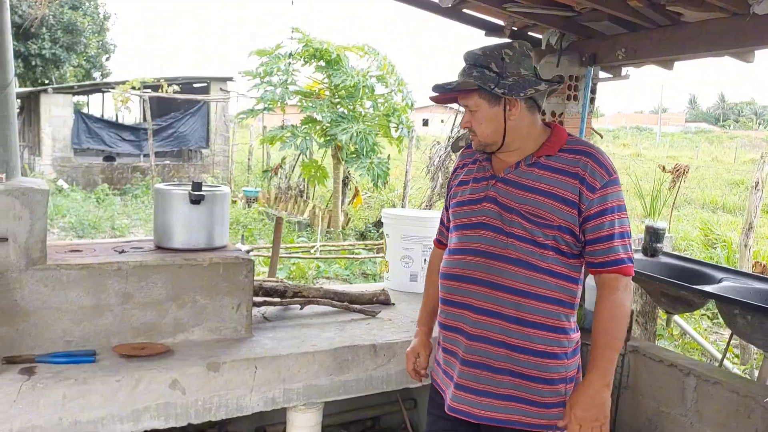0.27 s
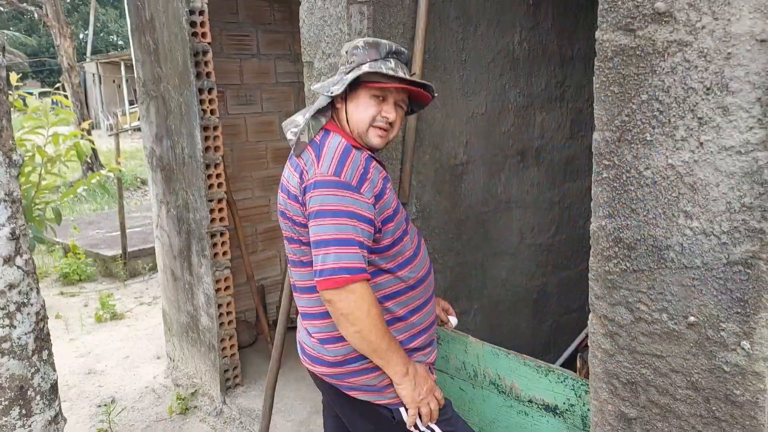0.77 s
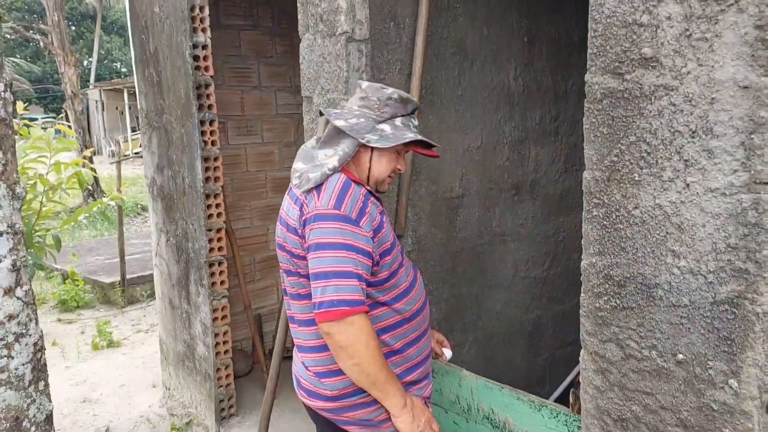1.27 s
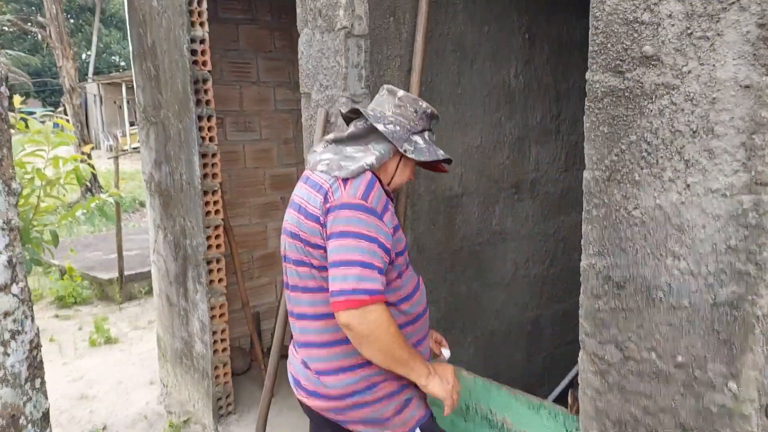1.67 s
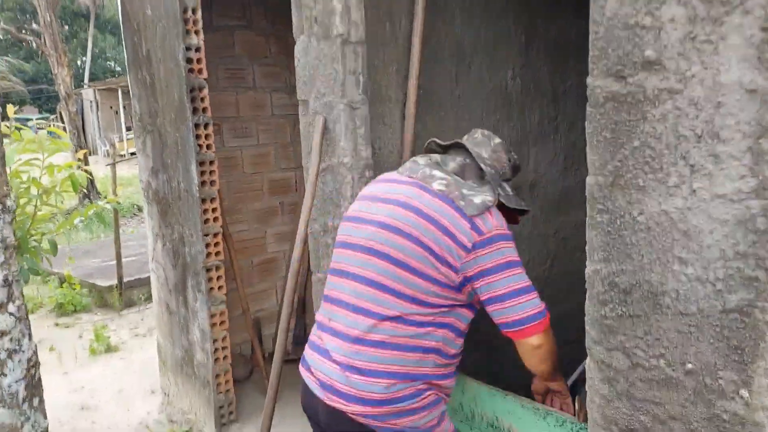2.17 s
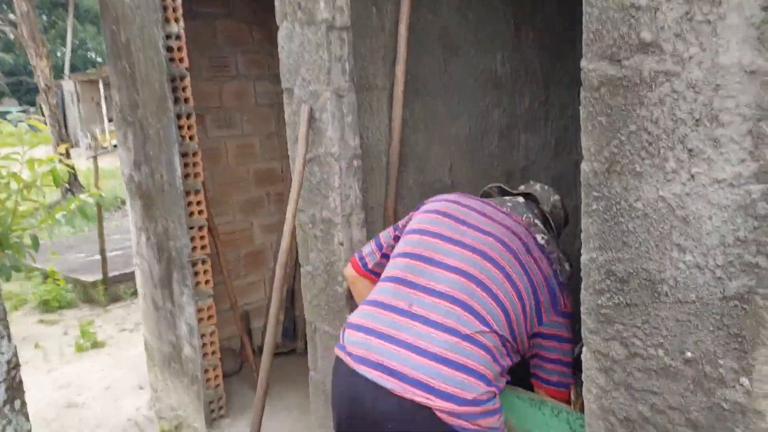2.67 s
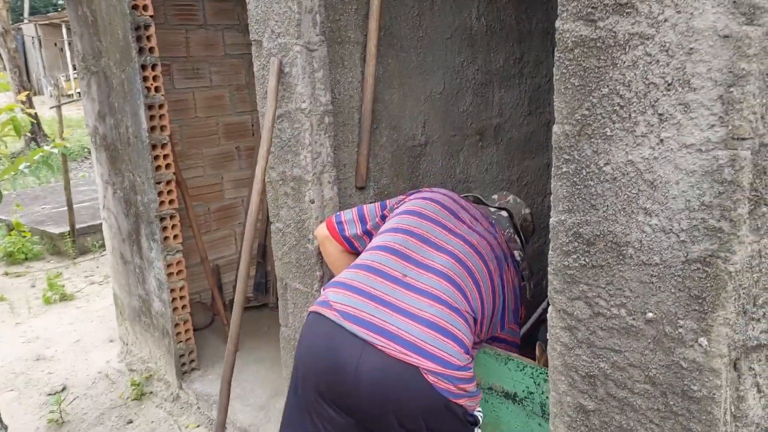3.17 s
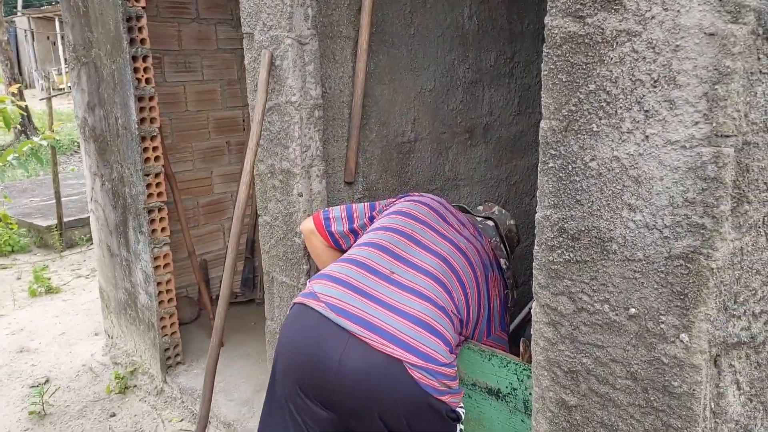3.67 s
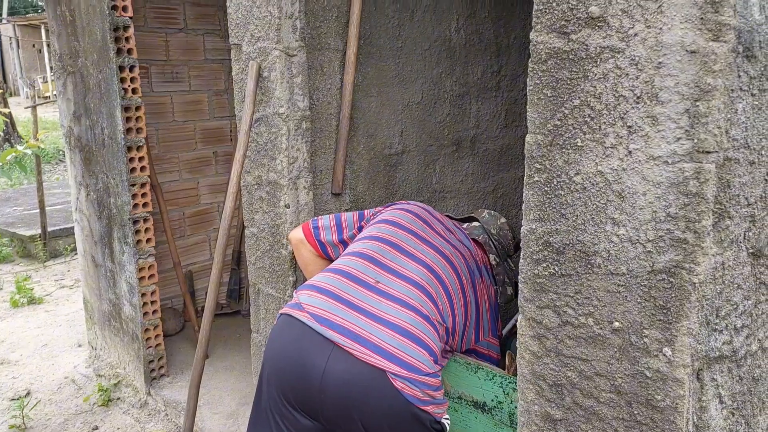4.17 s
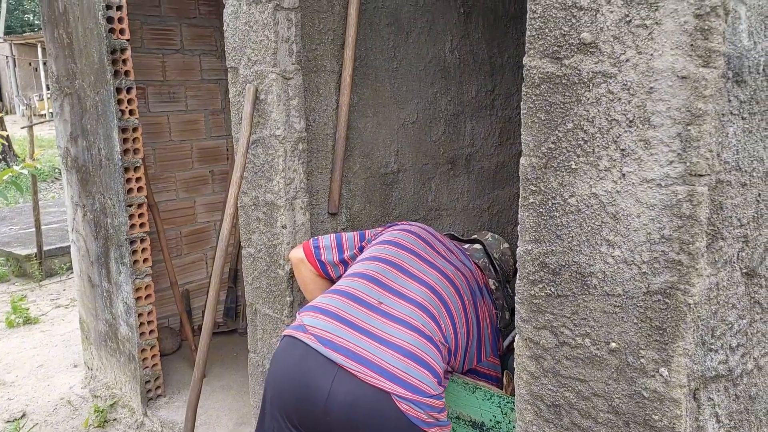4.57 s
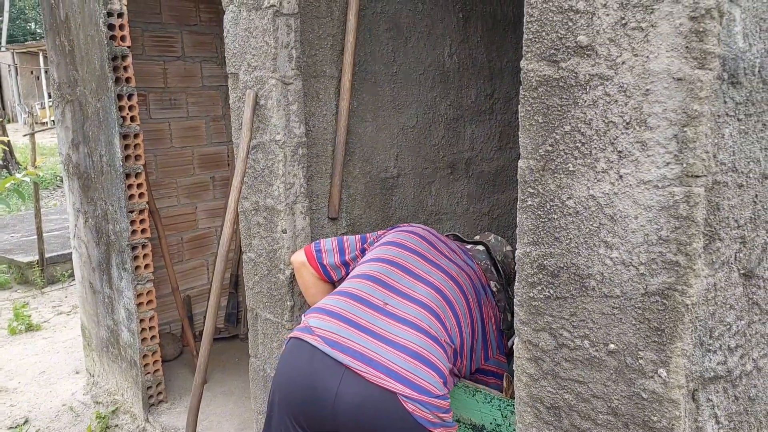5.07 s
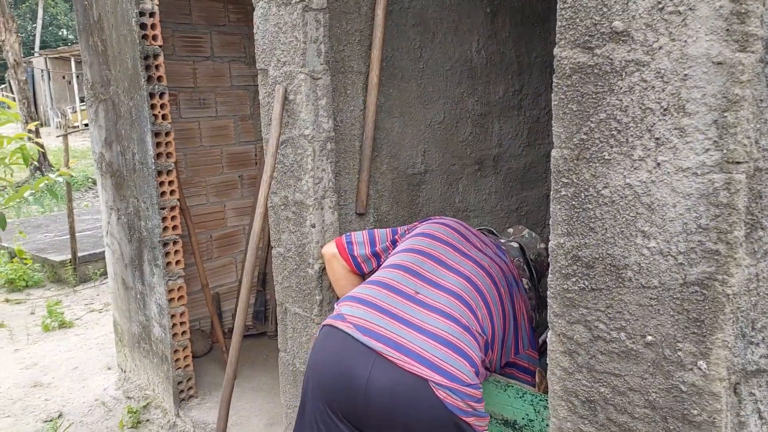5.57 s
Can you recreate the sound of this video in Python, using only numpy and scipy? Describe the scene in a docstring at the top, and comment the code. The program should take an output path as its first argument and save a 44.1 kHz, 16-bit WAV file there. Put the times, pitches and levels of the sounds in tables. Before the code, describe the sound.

A loud, wavering low drone in rushing noise ends abruptly with a hard clack. In a quiet yard with wind buffeting the microphone, faint chick peeps, scuffs and soft bumps lead to a burst of hoarse hen clucks inside a close concrete coop. A sharp board knock and a bright metal clank follow, then sparse weak clucks and a final shrill scrape.

```python
"""Hens caught in a concrete coop

A loud low rumble, a wavering drone in rushing noise, stops dead. Then hens are caught by hand in a small coop:
short hoarse clucks, pulses and rasp filtered by throat and beak, ring between the walls. Friction noise makes the
rustling feathers, struck resonances the knocks on a board, decaying modes one metal clank, and noise bursts the
snaps of twigs. Chicks peep faintly as gliding whistles; a light wind, slow low noise, buffets the microphone."""
import sys
import numpy as np
from scipy import signal
from scipy.fft import rfft, irfft, next_fast_len
from scipy.io import wavfile
from scipy.ndimage import uniform_filter1d, map_coordinates

SR = 44100
rng = np.random.default_rng(int(sys.argv[2]) if len(sys.argv) > 2 else 0)


def inscribe(sig):
    """Save sig as 16-bit PCM at rate SR to the path in sys.argv[1].

    A 1-D sig is mono; a 2-D sig holds one channel per row.
    Samples are clipped to [-1, 1] before scaling.
    """
    pcm = np.round(np.clip(np.atleast_2d(sig).T, -1, 1) * 32767)
    wavfile.write(sys.argv[1], SR, pcm.astype(np.int16))


N = 256986
T = np.arange(N) / SR
LOCAL = T[:SR // 2]  # time axis of one short event, in seconds

# Hen calls. Each row: start in seconds, length in seconds, pitch in Hz, level in dB, beak resonance in Hz,
# roughness from 0 to 1.
CALLS = [(1.2, 0.15, 743, -39.5, 740, 0.06), (2.91, 0.026, 662, -15, 1210, 0.4),
         (2.948, 0.027, 790, -11, 764, 0.15), (3.054, 0.034, 474.5, -4.5, 1010, 0.36),
         (3.08, 0.031, 588, -10.5, 1470, 0.22), (3.211, 0.034, 592.8, -8.5, 850, 0.33),
         (3.321, 0.046, 537, -19.5, 1250, 0.57), (3.381, 0.037, 544, -13.5, 1020, 0.37),
         (3.719, 0.034, 437.3, -26.5, 950, 0.48), (3.757, 0.037, 567, -24.5, 1110, 0.48),
         (3.936, 0.042, 522.5, -21.5, 1050, 0.59), (3.959, 0.047, 493, -20.5, 1010, 0.6),
         (4.501, 0.032, 398, -25.5, 1000, 0.41), (4.726, 0.043, 457, -32.5, 1180, 0.79),
         (5.276, 0.025, 418.5, -27.5, 1110, 0.78)]
# Response of the throat. Each row: frequency in Hz, gain in dB.
THROAT_RESPONSE = [(100, -38), (300, -14.5), (550, 2.5), (1400, -1), (1800, -10.5), (2100, -3),
                   (2400, -4.5), (3000, -16), (4100, -54), (5500, -56), (12000, -60)]
PITCH_SAG = 0.021  # share by which the pitch falls during a call
CREST_SHARE = 0.46  # share of a call spent swelling
# thin hiss from the open beak, its level relative to the call
HISS_DB, HISS_HZ, HISS_WIDTH_HZ = -21.5, 3590, 2470

# Decay of the coop. Each row: frequency in Hz, reverberation time T60 in seconds.
COOP_T60 = [(150, 0.33), (700, 0.27), (2000, 0.29), (6000, 0.2), (14000, 0.096)]
# Standing waves of the coop. Each row: frequency in Hz, width in Hz, boost in dB.
STANDING_WAVES = [(605, 16, 12), (776, 59, 5.5), (900, 37, 3), (1260, 29, 8), (1420, 28, -11),
                  (1680, 27, 8)]
# Likeness of the two channels of a noise. Each row: frequency in Hz, correlation from 0 to 1.
LIKENESS = [(50, 0.22), (130, 0.42), (300, 0.69), (600, 0.69), (1000, 0.12), (2000, 0.32), (4000, 0),
            (12000, 0.064)]

RUMBLE_END_S = 0.826
# Level of the drone. Each row: time in seconds, relative level in dB.
DRONE_LEVEL = [(0.0, -32), (0.088, -9), (0.254, -11), (0.274, -31), (0.328, -9.5), (0.426, -19),
               (0.516, -15.5), (0.536, -10), (0.622, -6), (0.672, -11.5), (0.8, -7.5)]
DRONE_START_HZ, DRONE_CLIMB_HZ_PER_S = 74.3, 4.2
DRONE_WAVER, DRONE_DB = 0.033, -0.6  # unsteadiness of pitch as a share; overall level of the drone
BOOM_DB, RUSH_DB = -20.5, -23.5  # steady low noise; mean level of the rushing noise
# Spectrum of the rushing noise. Each row: frequency in Hz, relative density in dB per Hz.
RUSH_SPECTRUM = [(76, -1.5), (130, -5.5), (274, -10), (472, -15), (625, -11), (829, -21), (954, -18.5),
                 (1430, -18.5), (2180, -18), (2610, -23), (4780, -22), (7300, -27.5), (8230, -34),
                 (14200, -29), (16000, -32)]
# Hollow resonances in the rushing noise. Each row: frequency in Hz, width in Hz, boost in dB.
HOLLOW_RESONANCES = [(572, 45, 5.5), (653, 31, 2.5), (955, 62, 7), (2200, 130, 2.5), (4670, 1040, 4.5)]

# Blows on the board. Each row: start in seconds, relative level in dB, decay of the contact noise in seconds,
# frequency in Hz above which the blow is dull.
BLOWS = [(2.272, -29, 0.048, 905), (2.313, -29, 0.027, 400), (2.442, -20, 0.03, 350),
         (2.456, -13.5, 0.0094, 2000), (2.861, -13.5, 0.045, 1800), (3.497, 5, 0.0074, 1010)]
# Resonances of the board. Each row: frequency in Hz, width in Hz, gain in dB.
BOARD_MODES = [(290, 30, -1.5), (364, 79, 3.5), (500, 120, -3), (698, 160, 0.5), (927, 90, 5.5),
               (1180, 120, -9)]
# Low bumps. Each row: start in seconds, relative level in dB, frequency in Hz.
BUMPS = [(1.101, -11, 88), (2.096, -11, 126), (2.348, -12.5, 73), (2.44, -16, 289), (4.904, -8.5, 80),
         (5.647, -11, 73.5)]

CLANK_S = 4.144
# Modes of the metal. Each row: frequency in Hz, relative level in dB, free decay T60 in seconds.
METAL_MODES = [(1588, -10, 0.36), (2783, -3, 0.18), (3332, -4, 0.23), (3505, -4, 0.29), (3822, -9, 0.13),
               (4425, -8, 0.14), (5922, 0, 0.15), (6212, -7, 0.16), (6503, -16, 0.47), (7084, -11, 0.46),
               (7305, -1, 0.15), (7714, -17, 0.2), (8990, -11, 0.13), (9615, -7, 0.1), (11350, -9, 0.11),
               (11700, -17, 0.13), (12050, -17, 0.13), (14550, -22, 0.15), (14810, -20, 0.15),
               (15290, -14, 0.17)]
# Spectrum of the clash. Each row: frequency in Hz, relative level in dB.
CLASH_SPECTRUM = [(300, -15), (1000, -23), (1500, -8.5), (2200, -8.5), (3400, -4.5), (4200, -14), (5500, 0),
                  (7300, -5.5), (8300, -16), (11300, -4.5), (13000, -20), (15500, -17)]

# Snaps of twigs and grit. Each row: start in seconds, relative level in dB, centre in Hz, decay T60 in seconds.
SNAPS = [(0.878, -21, 2500, 0.006), (1.671, -17.5, 3030, 0.0073), (1.799, -27.5, 1500, 0.036),
         (1.943, -20.5, 2480, 0.11), (2.093, -21.5, 2330, 0.0067), (2.186, -12.5, 5200, 0.01),
         (2.197, -21.5, 1710, 0.024), (2.427, -6, 1470, 0.006), (5.798, -2.5, 1800, 0.0055)]
SNAP_WIDTH = 0.89  # width of each snap resonance over its centre
CLACK_S, CLACK_DB, CLACK_T60_S = 0.796, -9.5, 0.037  # a hard clack just before the rumble stops
# Resonances of the clack. Each row: frequency in Hz, width in Hz, gain in dB.
CLACK_RESONANCES = [(1750, 610, -3), (4483, 330, 3.5), (7860, 10000, -18.5)]

# Brief hissing strokes, some brightening the rush of the rumble. Each row: crest in seconds,
# rise plus fall in seconds, level in dB, centre in Hz.
HISSING_STROKES = [(0.01, 0.042, -33, 5000), (0.236, 0.052, -19.5, 3270), (0.73, 0.24, -37, 14000),
                   (0.81, 0.02, -19, 7000), (1.14, 0.2, -40, 7850), (1.46, 0.079, -37.5, 7000),
                   (1.803, 0.08, -34, 3930), (1.955, 0.05, -26, 4400), (2.14, 0.15, -34.5, 2900),
                   (2.44, 0.14, -31, 2290), (2.87, 0.062, -25.5, 2700), (2.985, 0.2, -28, 2540),
                   (3.045, 0.027, -19.5, 4400), (3.18, 0.057, -30, 3070), (3.27, 0.06, -29, 4550),
                   (3.44, 0.087, -35, 4030), (3.6, 0.027, -28.5, 7100), (3.922, 0.046, -29.5, 6300),
                   (5.49, 0.078, -35, 2030), (5.7, 0.12, -35, 710)]
# Narrow-band scuffs, low or middling in pitch. Each row: crest in seconds, rise plus fall in seconds,
# level in dB, centre in Hz.
NARROW_SCUFFS = [(0.059, 0.032, -29, 2010), (1.07, 0.25, -35, 337), (2.495, 0.06, -28, 810),
                 (3.38, 0.24, -33, 210), (4.195, 0.06, -31, 486), (4.65, 0.12, -42, 2020),
                 (5.18, 0.17, -34, 2000), (5.21, 0.26, -37, 760)]
HISSING_WIDTH, SCUFF_WIDTH = 2.9, 0.58  # width of the resonance over its centre
RISE_SHARE = 0.43  # share of a stroke spent rising
# Colour of the friction noise. Each row: frequency in Hz, gain in dB.
FRICTION_COLOUR = [(100, 5), (500, 4.5), (2500, 1), (7200, -0.5), (8400, -9), (11000, -1.5), (16000, -0.5)]
# Fine rustle of the struggle. Each row: time in seconds, level in dB.
BUSTLE_LEVEL = [(1.9, -45), (2.4, -44.5), (2.8, -46), (3.1, -37), (3.4, -41.5), (3.7, -43.5), (4.1, -45.5),
                (4.4, -56)]
BUSTLE_HZ, BUSTLE_WIDTH_HZ, BUSTLE_GRAIN_DB = 6500, 29000, 3  # its colour and its graininess
# a shrill scrape that builds up and breaks off
SCRAPE_S, SCRAPE_RISE_S, SCRAPE_FALL_S, SCRAPE_DB = 5.798, 0.05, 0.015, -19.5
# Resonances of the scrape. Each row: frequency in Hz, width in Hz, gain in dB.
SCRAPE_RESONANCES = [(1660, 620, -1.5), (3570, 790, 0.5), (6850, 5200, -14)]

# Chick peeps. Each row: start in seconds, length in seconds, top pitch in Hz, relative level in dB,
# scoop at the start from 0 to 1, drop at the end from 0 to 1.
CHICK_PEEPS = [(1.108, .18, 3970, -34.5, .22, .3), (2.04, .135, 4100, -43, .16, .15),
               (2.685, .175, 4060, -38.5, .01, .14)]

# Strength of the breeze between gusts. Each row: time in seconds, relative level in dB.
BREEZE_LEVEL = [(0.87, -50.5), (1.4, -37), (1.5, -38), (2.26, -36), (2.63, -38.5), (4.15, -29.5),
                (5.48, -32), (5.8, -35.5)]
# Brief gusts. Each row: crest in seconds, level in dB.
GUST_CRESTS = [(1.45, -20), (1.53, -23), (1.79, -30.5), (1.98, -26), (2.11, -14.5), (4.97, -22.5),
               (5.11, -23.5), (5.66, -21.5)]
# Spectrum of the buffeting. Each row: frequency in Hz, relative density in dB per Hz.
BUFFET_SPECTRUM = [(13, -57), (22, -20), (48, -1.5), (81, 7), (96, 7), (114, -3.5), (160, -9.5),
                   (200, -16.5), (260, -23.5), (340, -17.5), (570, -120)]
BREEZE_DB, GUST_S = 5, 0.048  # overall level of the breeze; half length of a gust
WIND_LEFT_DB = 3.16  # gain on the left and loss on the right
# Hiss of the yard. Each row: time in seconds, level in dB.
YARD_LEVEL = [(0.85, -37.5), (2.4, -36), (5.8, -36)]
YARD_FLICKER_DB = 1.36  # unsteadiness of the hiss
# Spectrum of the hiss. Each row: frequency in Hz, relative density in dB per Hz.
YARD_SPECTRUM = [(88, -7), (150, -11), (309, -16), (414, -13.5), (448, -17), (514, -19.5), (730, -17),
                 (979, -20.5), (1120, -21), (1210, -22), (1290, -22), (2100, -20), (5360, -23),
                 (16000, -40.5)]

# the recorder: limiter ceiling over full scale, its recovery, upper band limit
CEILING_DB, RELEASE_DB_PER_S, TOP_HZ = 1.5, 42, 15900


def amp(db):
    """Level law: decibels to amplitude gain."""
    return 10 ** (np.asarray(db) / 20)


def unit(x):
    """Normalisation of power: scale to rms 1."""
    return x / np.sqrt(np.mean(x ** 2) + 1e-20)


def along(points, hz):
    """Interpolation of (frequency, value) points on a logarithmic frequency axis."""
    f, v = np.transpose(points)
    return np.interp(np.log(hz + 1), np.log(f + 1), v)


def curve(rows):
    """Linear interpolation of (time, value) points, one value per sample."""
    s, values = np.transpose(rows)
    return np.interp(T, s, values)


def wobble(rate, size=N):
    """Band-limited fluctuation: a smooth random curve with rate knots a second."""
    knots = rng.standard_normal(int(size * rate / SR) + 4)
    return map_coordinates(knots, [np.arange(size) * rate / SR])


def filtered(x, response):
    """Linear filtering: the spectrum of x times a response of frequency."""
    n = x.shape[-1]
    m = next_fast_len(n + 8192)  # padding leaves room for the ringing
    return irfft(rfft(x, m) * response(np.fft.rfftfreq(m, 1 / SR)), m)[..., :n]


def resonance(hz, centre, width):
    """Damped oscillator: a causal resonance with gain 1 at its centre."""
    return 1j * hz * width / (centre ** 2 - hz ** 2 + 1j * hz * width)


def boosted(peaks, hz):
    """Resonant colouring: (Hz, width Hz, boost dB) peaks whose decibels add."""
    return amp(sum(db * np.abs(resonance(hz, c, w)) ** 2 for c, w, db in peaks))


def bands(peaks, hz):
    """Parallel resonators: steep (Hz, width Hz, dB) resonances whose amplitudes add."""
    return sum(amp(db) * np.abs(resonance(hz, c, w)) ** 2 for c, w, db in peaks)


def noise(colour, size=N):
    """Partial coherence: coloured stereo noise of rms 1 whose channel correlation depends on frequency."""
    def mid_and_side(hz):
        angle = np.arccos(np.clip(along(LIKENESS, hz), -1, 1)) / 2
        return colour(hz) * np.array([np.cos(angle), np.sin(angle)])

    mid, side = filtered(rng.standard_normal((2, size)), mid_and_side)
    return unit(np.array([mid + side, mid - side]))


def add(out, s, x):
    """Superposition: mix x into out from time s."""
    start = max(round(s * SR), 0)
    out[:, start:start + x.shape[-1]] += x[..., :N - start]


def in_coop(x, wet_db):
    """Reverberation: a short sound plus the dense answer of close walls, coloured by standing waves."""
    hz, t, z = signal.stft(noise(lambda f: boosted(STANDING_WAVES, f), len(LOCAL)), SR, nperseg=256)
    decay = amp(-60 * t / along(COOP_T60, hz)[:, None])
    tail = signal.istft(z * decay, SR, nperseg=256)[1][:, :len(LOCAL)]
    tail = tail * (1 - np.exp(-(LOCAL / 0.0061) ** 2))  # the reflections build up within milliseconds
    answer = signal.fftconvolve(np.atleast_2d(x), tail / np.linalg.norm(tail[0]), axes=1)
    return x + amp(wet_db) * answer[:, :len(LOCAL)]


def hens():
    """Source and filter: unsteady syrinx pulses and rasp, sagging in pitch, shaped by throat and beak."""
    out, size = np.zeros((2, N)), len(LOCAL)
    for s, length, pitch_hz, db, beak_hz, rough in CALLS:
        u, rough = np.clip(LOCAL / length, 0, 1), np.clip(rough, 0, 1)  # u runs from 0 to 1 over the call
        pitch = pitch_hz * (1 + PITCH_SAG * (.5 - u)) * (1 + 0.1 * rough * wobble(276.0, size))
        phase = 2 * np.pi * np.cumsum(pitch) / SR
        tract = lambda hz: amp(along(THROAT_RESPONSE, hz)) * resonance(hz, beak_hz, 0.56 * beak_hz)
        pulses = sum(np.cos(k * phase) for k in np.arange(1, 13))
        voiced = unit(filtered(pulses, tract))
        puffs = rng.standard_normal(size) * (1 + 1.33 * np.cos(phase))
        # the rasp holds little below the pitch
        rasp = unit(filtered(puffs, lambda hz: tract(hz) * (1 - np.exp(-(hz / (0.8 * pitch_hz)) ** 4))))
        hiss = amp(HISS_DB) * unit(filtered(puffs, lambda hz: resonance(hz, HISS_HZ, HISS_WIDTH_HZ) ** 2))
        arch = np.abs(np.sin(np.pi * np.interp(u, [0, CREST_SHARE, 1], [0, .5, 1]))) ** .9
        swell = arch * amp(2.5 * rough * wobble(176, size))
        call = amp(db) * swell * (np.sqrt(1 - rough) * voiced + np.sqrt(rough) * rasp + hiss)
        # the loud calls come from close by and carry less of the walls
        add(out, s, in_coop(call, wet_db=np.interp(db, [-18, -6], [-3, -8])))
    return out


def rumble():
    """Amplitude modulation: a wavering low drone makes a hollow rush throb with it; both stop at once."""
    pitch = (DRONE_START_HZ + DRONE_CLIMB_HZ_PER_S * T) * (1 + DRONE_WAVER * wobble(26.2))
    phase = 2 * np.pi * np.cumsum(pitch) / SR
    tone = unit(np.sin(phase) + amp(-20) * np.sin(2 * phase))
    drone = amp(curve(DRONE_LEVEL) + DRONE_DB + 2.1 * wobble(32.7)) * tone
    boom = amp(BOOM_DB) * noise(lambda hz: resonance(hz, 72, 74) ** 2)
    rush = noise(lambda hz: amp(along(RUSH_SPECTRUM, hz)) * boosted(HOLLOW_RESONANCES, hz))
    throbbing = amp(RUSH_DB + 0.4 * wobble(59.3)) * rush * (1 + 0.14 * np.sin(phase))
    return (drone + boom + throbbing) * np.clip((RUMBLE_END_S - T) / 0.00043, 0, 1)


def knocks():
    """Forced vibration: dull blows with a short scuff ring the board; soft bumps give a low push."""
    out = np.zeros((2, N))

    def board(hz):
        bass_loss = 1j * hz / (250 + 1j * hz)  # a small board radiates little bass
        return sum(amp(db) * resonance(hz, c, w) for c, w, db in BOARD_MODES) * bass_loss

    for s, db, contact_s, soft_hz in BLOWS:
        scuff = 0.75 * rng.standard_normal(len(LOCAL)) * np.exp(-LOCAL / contact_s)
        force = scuff + np.exp(-LOCAL / 0.00043)
        ring = filtered(force, lambda hz: board(hz) / (1 + 1j * hz / soft_hz) ** 2)
        add(out, s, in_coop(amp(db + 1) * ring / np.abs(ring).max(), wet_db=-3.5))
    swell = amp(-60 * LOCAL / 0.062) * (1 - np.exp(-LOCAL / 0.0081))
    for s, db, hz in BUMPS:
        add(out, s, amp(db + 7) * np.sin(2 * np.pi * hz * LOCAL) * swell)
    return out


def clank():
    """Modal vibration: struck metal gives a bright clash, then its modes ring until the contact damps them."""
    modes = 0
    for hz, db, t60 in METAL_MODES:
        # each mode reaches the two microphones with its own phase
        phase = 2 * np.pi * (hz * LOCAL + rng.random()) + rng.normal(0, 1, (2, 1))
        modes = modes + amp(db - 60 * LOCAL / t60) * np.sin(phase)
    damping = np.exp(-(LOCAL / .11) ** 4)
    clash = noise(lambda hz: amp(along(CLASH_SPECTRUM, hz)), len(LOCAL)) * np.exp(-(LOCAL / .027) ** 2)
    attack = 1 - np.exp(-LOCAL / .0012)
    out = np.zeros((2, N))
    add(out, CLANK_S, amp(-15) * modes * attack * damping)
    add(out, CLANK_S, in_coop(amp(-10.5) * clash * attack, wet_db=-6.0))
    return out


def snaps():
    """Impulsive fracture: twigs and grit crack in decaying noise bursts; one harder clack rings a little."""
    out, size = np.zeros((2, N)), len(LOCAL)
    for s, db, centre_hz, t60 in SNAPS:
        burst = noise(lambda hz: resonance(hz, centre_hz, SNAP_WIDTH * centre_hz) ** 2, size)
        add(out, s, in_coop(amp(db + 1.0) * burst * amp(-60 * LOCAL / t60), wet_db=-19))
    clack = noise(lambda hz: bands(CLACK_RESONANCES, hz), size)
    add(out, CLACK_S, amp(CLACK_DB - 60 * LOCAL / CLACK_T60_S) * clack)
    return out


def stroke(crest_s, rise_s, fall_s, colour):
    """Friction: grainy noise of a given colour that swells to a crest and fades."""
    out, size = np.zeros((2, N)), len(LOCAL)
    rubbing = noise(lambda hz: amp(along(FRICTION_COLOUR, hz)) * colour(hz), size)
    grainy = rubbing * amp(2.06 * wobble(500, size) + 1.65 * wobble(68.7, size))
    t = LOCAL - 2 * rise_s  # time from the crest
    swell = np.exp(-np.abs(t / np.where(t < 0, rise_s, fall_s)) ** 2.05)
    add(out, crest_s - 2 * rise_s, unit(grainy) * swell)
    return out


def strokes(rows, width):
    """Repeated noise strokes of one shape, each with its own length, level and brightness."""
    out = np.zeros((2, N))
    for s, length, db, centre_hz in rows:
        colour = lambda hz: resonance(hz, centre_hz, width * centre_hz) ** 2
        out += amp(db) * stroke(s, RISE_SHARE * length, (1 - RISE_SHARE) * length, colour)
    return out


def litter():
    """Friction noise: a fine rustle that grows with the struggle, hissing strokes, narrow scuffs, a shrill scrape."""
    fine = noise(lambda hz: amp(along(FRICTION_COLOUR, hz)) * resonance(hz, BUSTLE_HZ, BUSTLE_WIDTH_HZ) ** 2)
    grainy = unit(fine * amp(BUSTLE_GRAIN_DB * wobble(700)))
    bustle = amp(curve(BUSTLE_LEVEL) + 2.2 * wobble(25.25)) * grainy
    scrape = stroke(SCRAPE_S, SCRAPE_RISE_S, SCRAPE_FALL_S, lambda hz: bands(SCRAPE_RESONANCES, hz))
    hissing = strokes(HISSING_STROKES, HISSING_WIDTH)
    scuffs = strokes(NARROW_SCUFFS, SCUFF_WIDTH)
    return bustle + hissing + scuffs + amp(SCRAPE_DB) * scrape


def chicks():
    """Frequency glide: thin whistles that scoop up, swell on a held pitch and drop abruptly."""
    out = np.zeros((2, N))
    for s, length, top_hz, db, scoop, drop in CHICK_PEEPS:
        u = np.clip(LOCAL / length, 0, 1)
        climb = np.interp(u, [0, .27, .6], [1, .13, 0])
        pitch = top_hz * (1 - scoop * climb - drop * u ** 14 + .004 * wobble(90, len(u)))
        swell = np.interp(u, [0, .1, .5, .72, .92, 1], [0, .5, .65, 1.1, .7, 0])
        tone = np.sin(2 * np.pi * np.cumsum(pitch) / SR)
        whistle = amp(db + 1.5 + 3.1 * wobble(33, len(u))) * swell * tone
        add(out, s, in_coop(whistle, wet_db=-13))
    return out


def outdoors():
    """Turbulence: once the rumble stops, breeze and gusts buffet the microphone over the hiss of the yard."""
    wind = noise(lambda hz: amp(along(BUFFET_SPECTRUM, hz)))
    # even out the noise's own swells, so that the breeze and gusts set the level
    power = np.abs(uniform_filter1d(np.mean(wind ** 2, axis=0), size=4000))
    wind = wind / np.sqrt(power + 0.45)
    breeze = amp(curve(BREEZE_LEVEL) + BREEZE_DB + 2.7 * wobble(12))
    gusts = sum(amp(db) * np.exp(-((T - s) / GUST_S) ** 2) for s, db in GUST_CRESTS)
    buffet = np.hypot(breeze, gusts) * wind * amp([[WIND_LEFT_DB], [-WIND_LEFT_DB]])
    hiss = noise(lambda hz: amp(along(YARD_SPECTRUM, hz)))
    air = amp(curve(YARD_LEVEL) + YARD_FLICKER_DB * wobble(42)) * hiss
    return (buffet + air) * (T > RUMBLE_END_S)


def scene():
    """Superposition with a level difference: hens, chicks, clank, snaps and litter lie a little to the right."""
    coop = hens() + clank() + snaps() + litter() + chicks()
    return coop * amp([[-.4], [.4]]) + rumble() + knocks() + outdoors()


def record(dry):
    """Dynamic limiting: loud peaks duck what follows, then gain recovers; the rest is rounded and band-limited."""
    over_db = np.maximum(20 * np.log10(np.abs(dry).max(axis=0) + 1e-9) - CEILING_DB, 0)
    recovery_db = RELEASE_DB_PER_S * T
    cut_db = np.maximum.accumulate(over_db + recovery_db) - recovery_db
    limited = dry * amp(-uniform_filter1d(cut_db, size=64))
    rounded = limited / (1 + np.abs(limited) ** 12) ** (1 / 12)
    return filtered(rounded, lambda hz: hz < TOP_HZ)


dry = scene()
out = record(dry)
inscribe(out)
```